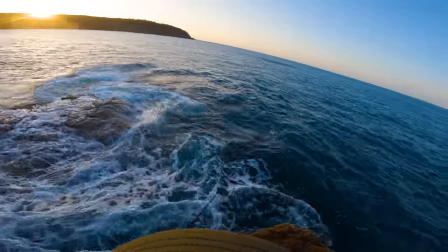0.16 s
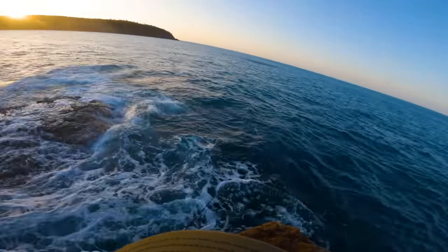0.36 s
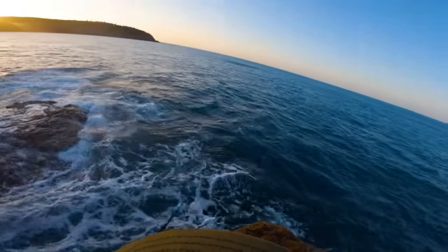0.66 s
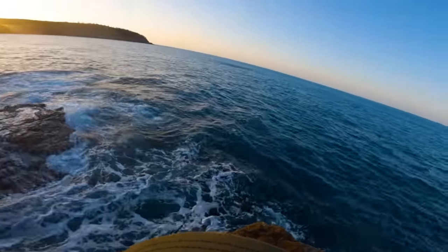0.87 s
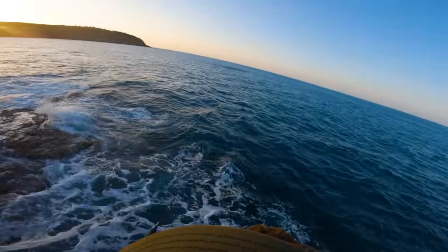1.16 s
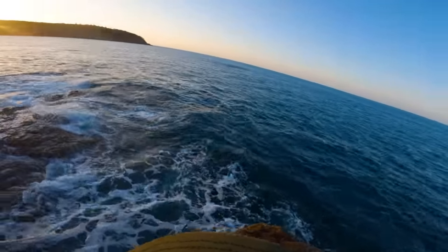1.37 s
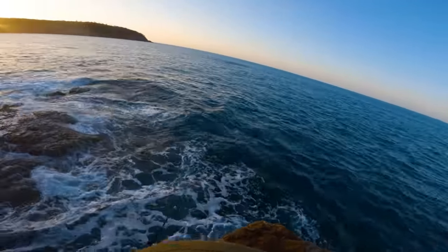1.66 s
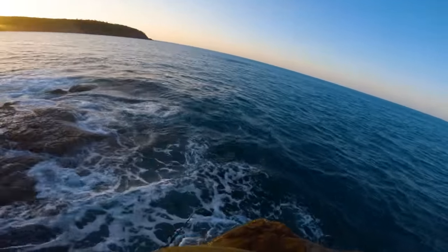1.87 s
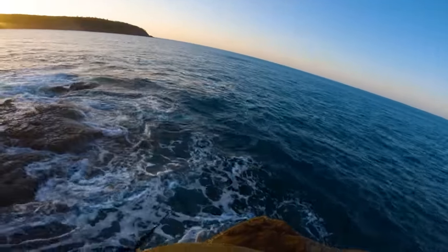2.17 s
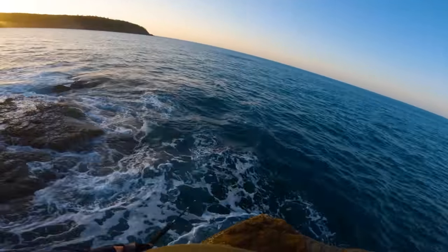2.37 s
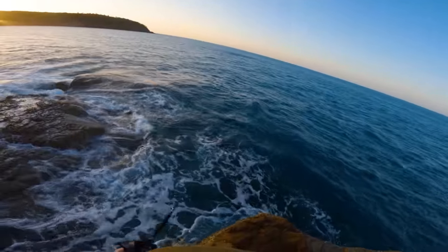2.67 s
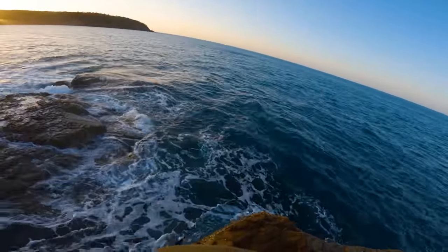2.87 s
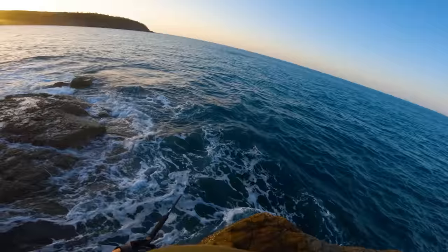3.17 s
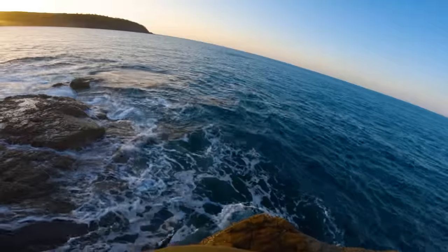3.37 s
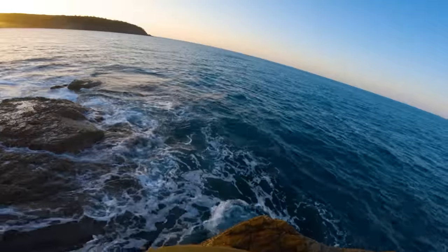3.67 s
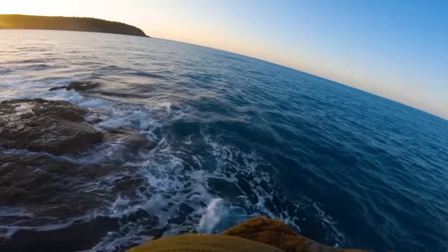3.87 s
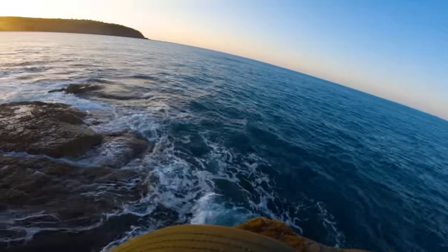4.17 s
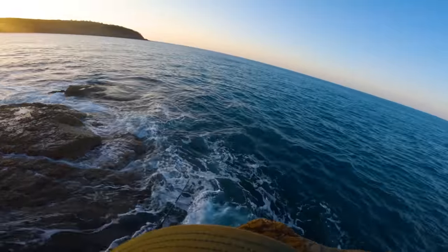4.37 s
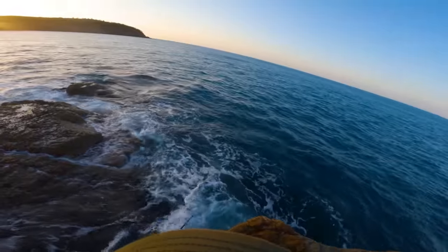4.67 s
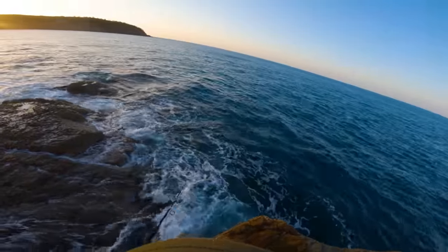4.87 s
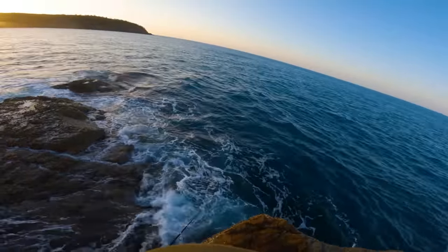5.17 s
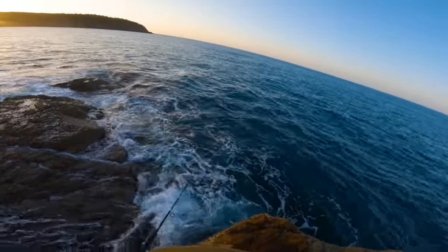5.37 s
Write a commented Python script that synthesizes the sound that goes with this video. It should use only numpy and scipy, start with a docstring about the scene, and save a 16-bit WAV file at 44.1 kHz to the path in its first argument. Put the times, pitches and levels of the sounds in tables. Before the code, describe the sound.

Outdoors at a rocky sea edge, with the microphone close to the water and in the wind. A wave is already spreading over the rock at 0 s, with a full, broad roar, low rumble, bright foam hiss and fine spray. Its body follows at about 0.7 s with dull slaps and a strong wind gust. The roar drains; foam runs up the stone around 1.6 s, with small watery slaps and tiny bright drops near 1.9 s. Backwash at 2.3 s and streaming water at 2.8 s lead to a low gulp around 3.3 s, then a quieter fizzing, gurgling lull. From 4 s the next wave swells, slapping and plunging at about 4.6 s, then breaks hard into a gully at 5.2 s with a hollow, mid-pitched whump, rumble and sharp fresh foam, still fizzing at the end. Bassy wind thumps and flutters throughout, easing slightly around the final break.

```python
"""First a wave spreads over a rock shelf and drains: filtered noise and ringing bubbles rumble, roar and fizz.
Foam runs up the stone, water streams back and the trough gulps; noise bursts make slaps and drops.
Then the next wave piles up, plunges and breaks into a gully, throwing up fresh foam and fine spray.
All through, two bands of noise make a gusty wind on the microphone, with its bass and peaks held down."""
import sys
import numpy as np
from scipy import signal
from scipy.fft import rfft, irfft, next_fast_len
from scipy.io import wavfile
from scipy.ndimage import uniform_filter1d, minimum_filter1d

SR = 44100
rng = np.random.default_rng(int(sys.argv[2]) if len(sys.argv) > 2 else 0)


def store_wav(level_fs):
    """Save 16-bit WAV to argv[1]."""
    pcm = np.round(np.clip(np.atleast_2d(level_fs), -1, 1) * 32767)
    wavfile.write(sys.argv[1], SR, pcm.T.astype(np.int16))


N = 242991
TIME = np.arange(N) / SR  # seconds


def surf_levels():
    """Rumble, roar, foam and spray in dB: each surge swells like a bell, then drains, over a calm sea."""
    # the sea between surges, before each layer's own trim: rumble/dB, roar/dB, foam/dB, spray/dB
    calm_db = [-40, -43.5, -41.5, -69.5]
    # surges of water over the rock, in the story's order, before each layer's own trim:
    # crest/s, build-up/s, draining/(dB per s), rumble/dB, roar/dB, foam/dB, spray/dB
    # the first wave spreads, its body follows, foam runs up, backwash, water streams off, the trough gulps,
    # the next wave piles up, its lip plunges, it breaks into the gully and throws up foam
    surges = [(0.1, 0.81, 9.5, -30, -27.5, -34.4, -61.5), (0.71, .28, 7.5, -35, -30.5, -42, -77.5),
              (1.6, .32, 14.5, -51, -39.5, -38, -67.3), (2.29, 0.21, 34, -39.5, -41.5, -48, -85),
              (2.83, 0.14, 1.2, -46, -44.5, -41.5, -71), (3.33, 0.4, 13.5, -37, -45.5, -42, -76),
              (4.6, .74, 14, -38.5, -30.5, -39, -78), (4.57, 0.065, 52, -53, -28.5, -53, -79),
              (5.18, 0.33, 6, -34.5, -26.5, -33.5, -65.4), (5.45, 0.083, 16, -43, -39.5, -38, -67)]
    power = from_db(calm_db)[:, None] ** 2
    for crest_s, build_s, drain_db_per_s, *levels_db in surges:
        age = TIME - crest_s
        swelling = np.exp(-(age / build_s) ** 2)
        draining = from_db(-drain_db_per_s * np.maximum(age, 0))
        envelope = np.where(age < 0, swelling, draining)
        power = power + (from_db(levels_db)[:, None] * envelope) ** 2
    return 10 * np.log10(power)


def roar(level_db):
    """White water tumbles and gurgles: broad over the shelf, hollow where it piles into the gully."""
    # tone of a wave spreading over the shelf: f/Hz, level per Hz/dB
    spreading_colour = [(250, -12), (450, -4), (640, -2.5), (850, -2), (1150, -4), (1500, -6.5),
                        (2000, -12), (3000, -18), (6000, -51)]
    # tone of a wave breaking into a gully: f/Hz, level per Hz/dB
    breaking_colour = [(250, -32), (420, -2.5), (550, -0.5), (660, 2.5), (770, 1), (900, 0.5), (1150, -2),
                       (1500, -6.5), (2000, -12), (3000, -15), (6000, -38)]
    # the second wave takes over from the first: start/s, end/s
    handover_s = [2.9, 3.1]
    wash = churn(231.7, 6200, patchy_db=1.0, together_db=0.05, rate=10, count=12)
    gurgle = bubbles(level_db, per_s=700, low_hz=504, high_hz=2400, cycles=26.4, spread_db=3.0, count=36)
    breaking = np.interp(TIME, handover_s, [0, 1])
    shelf = np.sqrt(1 - breaking) * water(wash, gurgle, spreading_colour, grain_db=-5)
    gully = np.sqrt(breaking) * water(wash, gurgle, breaking_colour, grain_db=-4.5)
    return from_db(level_db - 0.22) * (shelf + gully)


def rumble(level_db):
    """Big air pockets pulse under the wave."""
    # tone of the deep bubble clouds: f/Hz, level per Hz/dB
    rumble_colour = [(120, -21.5), (220, -2.5), (330, -1), (480, -3.5), (650, -7), (1000, -15.5),
                     (2000, -39)]
    wash = churn(107.8, 2026, patchy_db=0.6, together_db=0.0, rate=5.8, count=8)
    glugs = bubbles(level_db, per_s=160, low_hz=205.4, high_hz=700, cycles=20.0, spread_db=3, count=18)
    return from_db(level_db + 0.2) * water(wash, glugs, rumble_colour, grain_db=-5)


def foam(level_db, fresh_hz=3700, fresh_width_hz=1200, fresh_db=-3):
    """Small bubbles fizz in the sheet of foam; fresh, loud foam has a keener edge."""
    # tone of the foam: f/Hz, level per Hz/dB
    foam_colour = [(400, -26), (1000, 1.5), (1700, -1), (2200, -0.5), (2800, -0.5), (3300, -3.5),
                   (4000, -7.5), (5000, -10), (6000, -14), (7100, -18), (7800, -26), (8800, -38),
                   (14000, -70)]
    wash = churn(389, 12030, patchy_db=.5, together_db=0.4, rate=8.7, count=12)
    fizz = bubbles(level_db, per_s=2400, low_hz=1500, high_hz=7550, cycles=19.6, spread_db=2.0, count=36)
    sheet = water(wash, fizz, foam_colour, grain_db=-7.0)
    # 0 at the usual level or below, 1 at 20 dB above it
    freshness = np.clip((level_db - np.median(level_db)) / 20, 0, 1)
    edge = from_db(fresh_db) * freshness * resonate(sheet, fresh_hz, fresh_width_hz)
    return from_db(level_db + 1.5) * (sheet + edge)


def spray(level_db):
    """Fine droplets and bursting films crackle at the very top."""
    # tone of the spray: f/Hz, level per Hz/dB
    spray_colour = [(4000, -4), (7000, 8.5), (8200, -0.5), (9100, -4), (9900, -1), (11000, -4),
                    (12000, -6.5), (13000, -14), (14200, -22)]
    wash = churn(4400, 14000, patchy_db=0.3, together_db=1.1, rate=16, count=4)
    crackle = bubbles(level_db, per_s=1100, low_hz=5000, high_hz=13000, cycles=5, spread_db=5.5, count=10)
    return from_db(level_db + 7.5) * water(wash, crackle, spray_colour, grain_db=-11.0)


def slaps(width_share=.36, gain_db=-2):
    """A tongue of water traps a cloud of like-sized bubbles, which rings briefly."""
    # water slapping into rock hollows: peak t/s, centre f/Hz, level before gain_db/dB, length/s
    slap_list = [(0.647, 505, -28, 0.05), (0.708, 1380, -35, 0.021), (0.876, 437, -28, 0.047),
                 (1.413, 1170, -34, 0.022), (1.674, 1800, -32, 0.027), (1.891, 1870, -31.5, 0.018),
                 (2.11, 2400, -37.5, .03), (2.3, 890, -35, .04), (3.15, 2740, -40, .03),
                 (3.263, 297, -34.5, 0.1), (4.33, 1150, -32, 0.063), (4.39, 1260, -36, 0.022),
                 (4.492, 1500, -31, .025), (4.57, 675, -31, 0.026), (5.18, 730, -23, 0.023),
                 (5.257, 1260, -28.5, 0.025)]
    out = 0
    for s, hz, db, length in slap_list:
        width_hz = width_share * hz
        once = resonate(rng.standard_normal(N), hz, width_hz)
        cloud = resonate(once, hz, width_hz)
        out = out + from_db(db + gain_db) * burst(s, length) * rms_one(cloud)
    return out


def drops():
    """Thrown water lands on stone in short bright spatters."""
    # drops and small splashes on stone: peak t/s, level/dB, length/s
    drop_list = [(0.115, -49, .015), (1.872, -53, .006), (1.922, -54, .003), (1.977, -45, .002),
                 (2.814, -52, .02), (3.39, -56, .01), (4.478, -55, .03)]
    # tone of the spatters: f/Hz, level per Hz/dB
    drop_colour = [(1500, -6), (3500, -10), (7000, 10), (9000, -5), (10300, -5), (12500, -13), (14500, -28)]
    envelope = sum(from_db(db) * burst(s, length) for s, db, length in drop_list)
    return envelope * coloured(rng.standard_normal(N), drop_colour)


def wind_levels():
    """Thump and flutter in dB: a steady wind that swells in each gust and sags in each lull."""
    # gusts and lulls against the steady wind: t/s, half-length/s, thump change/dB, flutter change/dB
    gusts = [(0.0, 0.21, -7.5, 2.5), (0.698, .08, 9, 10), (1.7, 0.17, 2.5, 1.5), (2.27, .16, 2, -0.2),
             (2.95, .25, -1.5, -0.5), (3.7, 0.9, 1, 2), (4.58, 0.079, 5, 3), (4.82, .13, -6, -2.5),
             (5.317, 0.19, -4, -1)]
    thump_db, flutter_db = -20, -30.5  # the steady wind
    for s, half_length_s, more_thump_db, more_flutter_db in gusts:
        bell = np.exp(-((TIME - s) / half_length_s) ** 2)
        thump_db = thump_db + more_thump_db * bell
        flutter_db = flutter_db + more_flutter_db * bell
    return thump_db, flutter_db


def wind(thump_db, flutter_db):
    """Large eddies thump on the microphone port; small ones flutter over them in flurries."""
    # tone of the large eddies: f/Hz, level per Hz/dB
    thump_colour = [(6, -31), (14, -5), (28, 3.5), (45, 0), (72, 1), (100, -4), (120, -9), (150, -22.5),
                    (220, -40)]
    # tone of the small eddies: f/Hz, level per Hz/dB
    flutter_colour = [(80, -4.5), (110, -3.5), (132, 0), (165, -7.5), (210, -10.5), (280, -19), (500, -33),
                      (1200, -71)]
    large = limit_bass(coloured(rng.standard_normal(N), thump_colour), knee_db=-1.5, window_s=.05)
    small = limit_bass(coloured(rng.standard_normal(N), flutter_colour), knee_db=3.0, window_s=.05)
    flurries = from_db(unsteady(flutter_db, wander_db=2.5, rate=16)) * small
    buffets = from_db(thump_db) * large + flurries
    return hold_peaks(buffets, ceiling_db=-12.0, window_s=0.026)


def limit_bass(x, knee_db, window_s):
    """A fast limiter turns down whatever rises over its knee; rms 1."""
    size = max(int(window_s * SR), 2)
    power = uniform_filter1d(uniform_filter1d(x * x, size), size)
    return rms_one(x / np.sqrt(np.maximum(power, from_db(knee_db) ** 2)))


def hold_peaks(x, ceiling_db, window_s):
    """A look-ahead limiter eases the gain down around every peak that would pass the ceiling."""
    size = max(int(window_s * SR), 2)
    room = np.minimum(from_db(ceiling_db) / (np.abs(x) + 1e-9), 1)
    return x * uniform_filter1d(minimum_filter1d(room, size), size)


def water(wash, grains, colour, grain_db):
    """Merged wash plus bubbles that stand out of it, in one colour; rms 1."""
    return rms_one(coloured(wash, colour) + from_db(grain_db) * coloured(grains, colour))


def churn(low_hz, high_hz, patchy_db, together_db, rate, count):
    """Countless merged bubbles: each size class swells on its own, and all heave together."""
    edges = np.geomspace(low_hz, high_hz, count + 1)
    white = rng.standard_normal((2, N))  # neighbouring bands take different noise
    out = 0
    for k in range(count):
        band_pass = signal.butter(2, edges[k:k + 2], "band", fs=SR, output="sos")
        band = signal.sosfilt(band_pass, white[k % 2])
        out = out + band * from_db(patchy_db * drift(rate))
    return out * from_db(together_db * drift(rate))


def bubbles(level_db, per_s, low_hz, high_hz, cycles, spread_db, count):
    """Single bubbles ring at the pitch of their size, 60 dB down after some cycles; loud water makes more."""
    busy = from_db(level_db - np.mean(level_db))
    born = np.flatnonzero(rng.random(N) < per_s * busy / SR)
    strength = from_db(spread_db * np.minimum(rng.exponential(1, N), 4))
    # busier water makes weaker clicks, as the layer's level is applied later
    sizes = strength * rng.choice([-1, 1], N) / np.sqrt(busy)
    dealt = rng.integers(0, count, N)  # which pitch each bubble gets
    pitches = np.geomspace(low_hz, high_hz, count) * np.exp(rng.normal(0, .01, count))
    out = 0
    for k, hz in enumerate(pitches):
        mine = born[dealt[born] == k]
        clicks = np.zeros(N)
        clicks[mine] = sizes[mine]
        out = out + resonate(clicks, hz, np.log(1000) / np.pi * hz / cycles)
    return out


def burst(s, length):
    """A quick swell that takes half its length to peak at s and dies more slowly."""
    age = np.maximum(2 * (TIME - s) / length + 1, 0)
    return age * np.exp(1 - age)


def unsteady(level_db, wander_db, rate):
    """Turbulence makes a level wander by chance, about rate times a second."""
    return level_db + wander_db * drift(rate)


def drift(rate):
    """Slow chance of spread 1, changing about rate times a second."""
    # drawn once every 40 samples; the first 2000 draws let the filter settle
    r = np.exp(-80 * np.pi * rate / SR)
    slow = signal.lfilter([1], [1, -2 * r, r * r], rng.standard_normal(N // 40 + 2002))[2000:]
    return np.interp(np.arange(N) / 40, np.arange(len(slow)), rms_one(slow))


def coloured(x, colour):
    """Give a sound a smooth spectrum that falls away past both ends; rms 1."""
    size = next_fast_len(N)
    hz, db = np.transpose(colour)
    octave = np.log2(np.maximum(np.arange(size // 2 + 1) * SR / size, 1))
    outside = np.abs(octave - np.clip(octave, np.log2(hz[0]), np.log2(hz[-1])))
    gain = from_db(np.interp(octave, np.log2(hz), db) - 24 * outside)  # 24 dB per octave outside
    return rms_one(irfft(rfft(x, size) * gain, size)[:N])


def resonate(x, hz, width_hz):
    """A resonance with gain 1 on top: a wider one dies sooner."""
    r = np.exp(-np.pi * width_hz / SR)
    top = np.array([1, 0, -1]) * (1 - r * r) / 2
    return signal.lfilter(top, [1, -2 * r * np.cos(2 * np.pi * hz / SR), r * r], x + 1e-18)


def from_db(db):
    """Decibels to gain."""
    return 10 ** (np.asarray(db) / 20)


def rms_one(x):
    """Scale to unit power."""
    return x / np.sqrt(np.mean(x ** 2) + 1e-20)


def scene():
    """Surf in front, wind on the microphone."""
    rumble_db, roar_db, foam_db, spray_db = surf_levels()
    thump_db, flutter_db = wind_levels()
    deep = rumble(unsteady(rumble_db, wander_db=0.96, rate=6)) + roar(roar_db)
    bright = foam(unsteady(foam_db, wander_db=0.31, rate=2.9)) + spray(spray_db)
    buffets = wind(thump_db, flutter_db)
    return (deep + bright + slaps() + drops() + buffets)[None]


def record(dry):
    """The recorder cuts the top steeply above 14250 Hz; both ends are eased over 3 milliseconds."""
    ends = np.minimum(np.minimum(TIME, TIME[-1] - TIME) / .003, 1)
    top_cut = signal.ellip(10, .1, 80, 14250, fs=SR, output="sos")
    return ends * signal.sosfilt(top_cut, dry)


dry = scene()
out = record(dry)
store_wav(out)
```